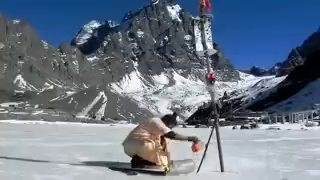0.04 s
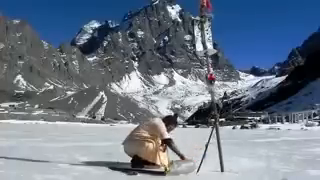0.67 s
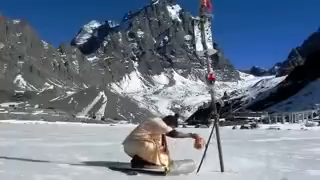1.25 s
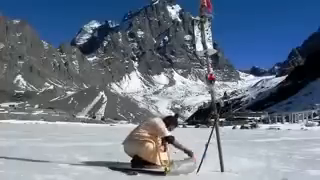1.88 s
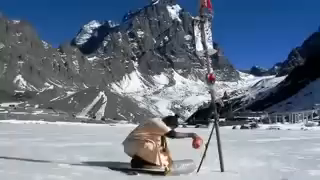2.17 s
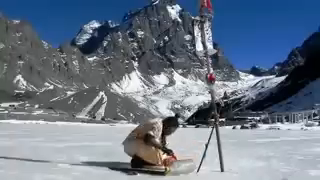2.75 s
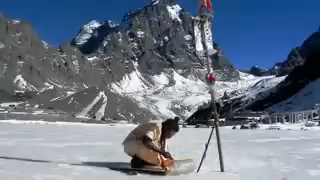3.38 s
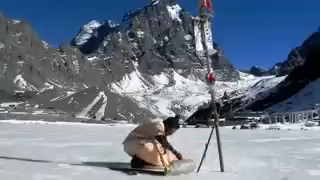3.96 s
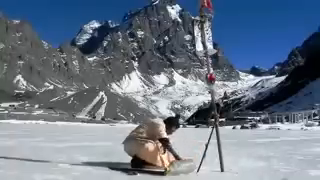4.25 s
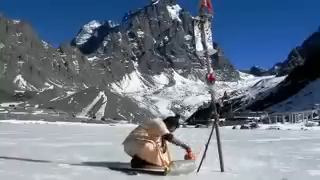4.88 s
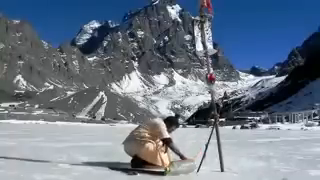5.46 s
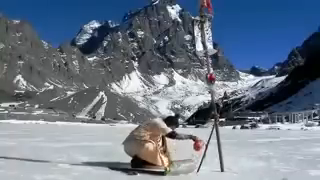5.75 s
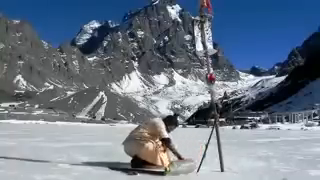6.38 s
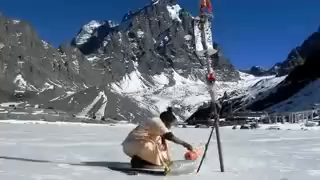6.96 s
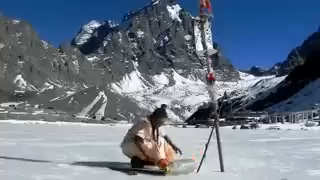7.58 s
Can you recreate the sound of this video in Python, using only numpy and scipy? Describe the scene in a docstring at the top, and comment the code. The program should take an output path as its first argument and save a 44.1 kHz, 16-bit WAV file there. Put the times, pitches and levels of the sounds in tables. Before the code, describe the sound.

A small pot dips into water in an ice hole right at the start, with a close slap, a hollow plop and a few drips. At about 0.5 seconds the water is flung out and spatters on the ice, fading into a trickle. Glugging dips follow around 1 and 2 seconds, each answered by a short splash, at 1.6 and 2.6 seconds. From 3 to about 4.2 seconds it is quieter, with small slaps and gentle swishes. The pot gulps again around 4.5 seconds and a throw lands at 5.1. Two more scoops come at 5.7 and 6.7 seconds, with splashes at about 6.1 and 7.2. Single fat drops tick on the ice, and drips plink back into the hole. Throughout, light wind buffets the microphone with a low rumble and soft, irregular thumps over a faint open-air hiss.

```python
"""A slap, a plop and a glug: someone crouching on a frozen lake dips a small pot into a hole in the ice,
then flings the water out, again and again. On each dip water slaps the pot and shuts in pockets of air
that ring as bubbles. Each throw spatters on the ice and ends in a trickle; the lifted pot drips dry.
Behind it, light wind buffets the microphone over a faint open-air hiss."""
import sys
import numpy as np
from scipy import signal
from scipy.io import wavfile
from scipy.ndimage import uniform_filter1d

SR = 44100
rng = np.random.default_rng(int(sys.argv[2]) if len(sys.argv) > 2 else 0)


def pcm_store(signal):
    """Save signal as 16-bit PCM."""
    levels = np.round(np.clip(np.atleast_2d(signal), -1, 1) * 32767)
    wavfile.write(sys.argv[1], SR, levels.astype(np.int16).T)


N = 336042

# The pot gulps: a slap, a plop as air is shut in, then a ringing bubble. Each row: start in seconds,
# relative slap level in dB, pitch of the struck hollow in Hz, plop level in dB, ring level in dB,
# ring pitch in Hz, ring decay in seconds.
GULPS = [(0.0781, -26, 2050, -19.5, -37, 308, 0.011), (0.9165, -31, 802, -21.5, -34, 354, 0.064),
         (1.1199, -27.5, 780, -20, -38, 383, 0.026), (1.9298, -28, 2500, -43, -16.5, 436, 0.0056),
         (2.0323, -28.5, 840, -16.5, -25, 397, 0.016), (2.0881, -23.5, 1950, -15.5, -23, 404, 0.0082),
         (2.129, -24, 2440, -38, -31, 608, 0.012), (3.051, -31.5, 710, -30, -28.5, 500, 0.0085),
         (3.7856, -33.5, 1980, -33, -38, 433, .005), (4.33, -27, 1560, -43, -29, 372, 0.017),
         (4.4428, -32, 1960, -30, -21, 470, 0.013), (4.6239, -28.5, 1720, -32, -32.5, 600, 0.043),
         (5.668, -30, 770, -34, -33, 628, .04), (5.6915, -24.5, 800, -26, -25.5, 677, 0.011),
         (5.714, -33, 900, -18.5, -29, 286, 0.0042), (5.727, -28, 1050, -15.5, -23, 392, 0.013),
         (6.609, -34, 1330, -23, -34, 437, 0.022), (6.7167, -36, 1810, -26.5, -34.5, 565, 0.039),
         (6.7628, -29.5, 2590, -22.5, -30.5, 654, 0.012), (6.781, -35, 2050, -25.5, -31, 373, 0.025),
         (6.8096, -26.5, 2770, -23, -34, 252, 0.0054)]
SLAP_TO_PLOP_S = 0.00398


def plops(half_width_cycles=0.25):
    """A closing air pocket gives one push of pressure between two dips; bigger pockets push slower."""
    out, t = np.zeros(N), np.arange(-300, 300) / SR
    for s, _, _, db, _, ring_hz, _ in GULPS:
        widths = t * ring_hz / half_width_cycles
        push = (1 - 1.2 * widths ** 2) * np.exp(-widths ** 2 / 2)
        add(out, s + SLAP_TO_PLOP_S + t[0], gain_of(db) * push)
    return out


# Bubbles glug up through the water, some just after a slap. Each row: start in seconds, level in dB,
# pitch in Hz, relative pitch rise per second, decay in seconds.
GLUGS = [(.06, -30.5, 569, 5, 0.12), (.812, -33, 388, 1.5, 0.022), (.921, -34.5, 778, 0.5, 0.031),
         (.97, -19, 365.6, 7.5, 0.03), (.999, -17.5, 382.4, 6.5, 0.021), (1.216, -38.5, 403, 4, 0.069),
         (1.786, -28.5, 419, 1, 0.0089), (1.973, -22, 398, 10.5, .01), (2.071, -24, 508, 7.5, 0.021),
         (4.29, -33, 405, -0.5, 0.015), (4.527, -19.5, 427, 8.5, 0.0068), (4.655, -31.5, 665, 4.5, 0.019),
         (5.348, -31, 382, 3, 0.02), (5.517, -31, 310, 18, 0.05), (5.539, -29.5, 455, 28, 0.012),
         (6.324, -31, 409, 11.5, 0.014), (6.658, -33, 432, 3, 0.0094), (6.829, -29.5, 687, 2, 0.0098)]
# Drips from the pot plink back into the hole. Each row: start in seconds, level in dB, pitch in Hz.
PLINKS = [(.152, -37.5, 1100), (.222, -43, 1300), (2.177, -41, 683), (2.256, -43.5, 886), (2.291, -45, 930),
          (2.442, -48, 1265), (4.804, -42, 647), (5.77, -32.5, 703), (5.802, -36.5, 650),
          (6.851, -42, 1064), (6.927, -42, 1070), (6.943, -37.5, 1030), (7.321, -32.5, 960)]


def glugs(gulp_rise=4.9, plink_rise=7, plink_decay_s=0.0074, wobble=0.34, slosh_db=-11, life_s=0.045):
    """Bubbles wobble as they ring, stir the water around them and die once they break the surface."""
    rings, stir = np.zeros(N), np.zeros(N)
    trapped = [(s + SLAP_TO_PLOP_S, db, hz, gulp_rise, decay) for s, _, _, _, db, hz, decay in GULPS]
    dripped = [(s, db, hz, plink_rise, plink_decay_s) for s, db, hz in PLINKS]
    for s, db, hz, rise, decay in trapped + GLUGS + dripped:
        ring = bubble(hz, rise, onset_s=0.00032, decay_s=decay)
        age = np.arange(len(ring)) / SR
        ring *= gain_of(db) / np.sqrt(1 + (age / life_s) ** 8)  # choked at the surface
        add(rings, s, ring)
        add(stir, s, abs(ring))
    slosh = droplets(per_s=2500, spread_db=1, cycles=2.4, low_hz=335, high_hz=660, count=12)
    slosh *= gain_of(slosh_db) * uniform_filter1d(stir, size=128)
    return rings * (1 + wobble * wander(per_s=160)) + slosh


# Further slaps of water, at the pot or on the ice, some followed by a glug.
# Each row: start in seconds, relative level in dB, pitch of the hollow in Hz.
SLAPS = [(.052, -28, 800), (0.1071, -23, 2500), (.618, -32.5, 1700), (0.754, -29.5, 1360),
         (1.1498, -24.5, 2060), (2.0697, -31.5, 1530), (2.8467, -33.5, 1500), (3.063, -30, 1770),
         (3.073, -33, 2560), (4.6102, -33, 1010), (4.781, -41.5, 2300), (5.28, -34.5, 1320),
         (5.32, -32.5, 1380), (5.345, -28.5, 1280), (5.3673, -31.5, 1460), (6.3168, -25, 1010)]
# The wet pot's dull resonances. Each row: frequency in Hz, gain in dB.
POT_EQ = [(110, -15.5), (190, -0.5), (650, 1), (1100, -9.5), (1700, -5), (2150, -9.5), (2650, -5),
          (3100, -9.5), (3700, -7.5), (5200, -21), (8800, -34)]


def slaps(level_db=-5, hollow_db=5, onset_s=0.0012, length_s=0.011, tail_db=-15, tail_s=0.018):
    """Water strikes a hollow: a tight, coloured burst of spray with a faint tail of falling drops."""
    spray = evened(coloured(impacts(per_s=9000, spread_db=3), POT_EQ))
    out, t = np.zeros(N), np.arange(SR // 8) / SR
    attack = 1 - np.exp(-t / onset_s)
    body = np.exp(-(t / length_s) ** 2)
    tail = gain_of(tail_db) * np.exp(-t / tail_s)
    for s, db, hz, *_ in GULPS + SLAPS:
        burst = spray[int(s * SR):][:len(t)] * attack * (body + tail)
        hollow = signal.lfilter(*signal.iirpeak(hz, Q=7, fs=SR), burst)
        burst += gain_of(hollow_db) * hollow
        peak_rms = np.sqrt(uniform_filter1d(burst ** 2, size=256).max())
        add(out, s, gain_of(db + level_db) * burst / peak_rms)
    return out


# A potful rains on the ice. Each row: first landing in seconds, swell time in seconds, end of the main
# sheet in seconds, level in dB, extra treble in dB.
THROWS = [(.525, .04, 0.76, -38, 0.5), (1.578, 0.047, 1.888, -39, 1), (2.604, 0.044, 2.873, -40, 1),
          (5.095, 0.17, 5.356, -38.5, -0.5), (6.144, .14, 6.457, -38.5, 1.5),
          (7.173, .045, 7.347, -38.5, 3.5)]
# The tone of water hitting ice. Each row: frequency in Hz, gain in dB.
SPATTER_EQ = [(150, -48.5), (250, -13.5), (415, 0), (535, -4.5), (787, -0.5), (861, -18), (942, -6.5),
              (1540, 0.5), (1730, -5), (1900, -1.5), (3190, -5.5), (4710, -9.5), (6060, -20.5), (7810, -22),
              (8800, -33), (11400, -64.5), (19400, -120)]


def throws(clump_db=2, surge_db=1.5, fine_spray_db=5, fine_spray_s=0.055):
    """Sheets of water break into clumps of ticks, fizz and bubble notes; the finest spray lands first."""
    ticks = evened(coloured(impacts(per_s=4000, spread_db=3.2), SPATTER_EQ))
    fizz = droplets(per_s=1400, spread_db=3, cycles=2.5, low_hz=950, high_hz=3700)
    notes = droplets(per_s=130, spread_db=3.1, cycles=5.5, low_hz=850, high_hz=2400, rise=0.035)
    clumps = gain_of(clump_db * wander(per_s=90))
    spatter = evened((ticks + gain_of(-4) * fizz + gain_of(-1.5) * notes) * clumps)
    treble = signal.sosfiltfilt(signal.butter(2, 3500, "high", fs=SR, output="sos"), spatter)
    out, t = np.zeros(N), np.arange(N) / SR
    for start, swell, end, db, treble_db in THROWS:
        fine_spray = np.exp(-np.maximum(t - start, 0) / fine_spray_s)
        brightness = gain_of(treble_db + fine_spray_db * fine_spray)
        sheet = gain_of(db) * envelope(start, swell, end, fall_db_per_s=114)
        out += sheet * (spatter + (brightness - 1) * treble)
    return out * gain_of(surge_db * wander(per_s=32))


# Single fat drops tick on the ice. Each row: start in seconds, level in dB, pitch in Hz.
FAT_DROPS = [(.2, -22, 1160), (.2455, -33, 1920), (.362, -36, 2020), (.4445, -31.5, 3580),
             (.6315, -19.5, 1970), (.732, -24, 2320), (.9545, -30.5, 3820), (2.7535, -27, 2000),
             (5.947, -32, 3730), (6.027, -36, 4760), (6.434, -19.5, 5500), (6.4662, -23, 2820)]


def fat_drops(decay_cycles=0.88):
    """A fat drop snaps and rings for a cycle or two."""
    out = np.zeros(N)
    for s, db, hz in FAT_DROPS:
        add(out, s, gain_of(db) * bubble(hz, rise=0, onset_s=0.5 / hz, decay_s=decay_cycles / hz))
    return out


# The pot comes up streaming and drips dry. Each row: start in seconds, relative level in dB.
LIFTS = [(.11, -47), (1.15, -50.5), (2.13, -51.5), (5.72, -47.5), (6.82, -50)]
# The pot swishes through the water. Each row: crest time in seconds, relative level in dB.
SWISHES = [(0.032, -39), (1.012, -44), (3.727, -47), (4.249, -48), (4.3, -48), (4.52, -49.5),
           (4.581, -47.5), (4.785, -45.5)]


def trickle(level_db=-2, runoff_db=-10.5, swish_in_s=0.031, swish_out_s=0.024):
    """Loose water patters, plinks and laps, riding up with each throw's run-off, each lift and swish."""
    t = np.arange(N) / SR
    runoff = [gain_of(db + runoff_db) * envelope(start, end - start, end, fall_db_per_s=29)
              for start, _, end, db, _ in THROWS]
    lifts = [gain_of(db) * envelope(s, swell=0.015, end=s, fall_db_per_s=28) for s, db in LIFTS]
    swishes = [gain_of(db) * np.exp(-np.maximum((s - t) / swish_in_s, (t - s) / swish_out_s))
               for s, db in SWISHES]
    flow = np.linalg.norm(runoff + lifts + swishes, axis=0)  # they add in power
    patter = evened(coloured(impacts(per_s=3000, spread_db=3.8), SPATTER_EQ))
    plinks = droplets(per_s=65, spread_db=2.5, cycles=4.5, low_hz=750, high_hz=2800, rise=0.03)
    drips = evened(patter + gain_of(-3.5) * plinks)
    laps = droplets(per_s=40, spread_db=4, cycles=4.5, low_hz=390, high_hz=1104, rise=0.055, count=12)
    return gain_of(level_db) * flow * (drips + gain_of(-10) * laps)


def early_echoes(x, level_db=-15, decay_s=0.025, per_s=2000, gap_s=0.003):
    """The rim of the hole and the crouching body throw back faint, early echoes."""
    t = np.arange(SR // 8) / SR
    taps = rng.standard_normal(len(t)) * (rng.random(len(t)) < per_s / SR)
    taps *= np.exp(-t / decay_s) * (t > gap_s)
    return gain_of(level_db) * signal.oaconvolve(x, taps / np.linalg.norm(taps))[:N]


# The slow rise and fall of the breeze. Each row: time in seconds, relative level in dB.
GUSTS = [(0.0, -46), (1.74, -51.5), (2.31, -44.5), (2.63, -54.5), (3.03, -52.5), (3.52, -62.5), (4.37, -51),
         (4.79, -50), (5.69, -57.5), (6.09, -45), (6.79, -55.5), (7.62, -44)]
# Strong eddies thump the microphone. Each row: crest time in seconds, level in dB.
THUMPS = [(.16, -34), (.46, -37.5), (1.13, -32.5), (1.22, -33.5), (1.89, -33), (2.23, -40), (2.46, -40.5),
          (3.06, -45), (3.849, -41), (4.3, -41), (4.65, -46), (4.79, -41.5), (4.87, -41), (5.34, -42),
          (5.9, -35), (6.01, -41.5), (6.191, -38), (6.43, -37.5), (7.23, -39)]
# The wind's low rumble. Each row: frequency in Hz, gain in dB.
WIND_EQ = [(8.8, -35.5), (15, -5.5), (38, 1.5), (60, 1.5), (114, -9), (161, -20.5), (225, -32),
           (248, -50.5), (260, -30.5), (340, -80), (570, -120)]


def wind(breeze_db=2, lump_db=3, thump_half_s=0.035):
    """Eddies buffet the microphone, their strength following the breeze; a few strong ones thump it."""
    t = np.arange(N) / SR
    eddies = evened(coloured(rng.standard_normal(N), WIND_EQ, size=32768))
    eddies /= np.sqrt(uniform_filter1d(eddies ** 2, size=3000) + 1e-6)  # iron out the noise's own swells
    lumps = evened(gain_of(lump_db * wander(per_s=16)))
    breeze = gain_of(np.interp(t, *np.transpose(GUSTS)) + breeze_db) * lumps
    thumps = sum(gain_of(db) * np.exp(-((t - s) / thump_half_s) ** 2) for s, db in THUMPS)
    return np.hypot(breeze, thumps) * evened(eddies)


# The tone of the open air. Each row: frequency in Hz, gain in dB.
AIR_EQ = [(59, -39.5), (100, -17), (140, -8.5), (166, -9.5), (270, -11), (314, -10), (351, -2.5),
          (651, -11.5), (1280, -16), (1400, -14), (1860, -16), (7860, -24), (8800, -31), (11400, -63),
          (19400, -120)]


def air(level_db=-60):
    """A steady bed of faint open-air hiss."""
    return gain_of(level_db) * evened(coloured(rng.standard_normal(N), AIR_EQ))


def bubble(hz, rise, onset_s, decay_s):
    """A bubble rings and climbs as it nears the surface; rise is the relative pitch change per second."""
    t = np.arange(int(6 * decay_s * SR) + 2) / SR
    shape = (1 - np.exp(-t / onset_s)) * np.exp(-t / decay_s)
    return shape / shape.max() * np.sin(2 * np.pi * hz * (t + rise * t * t / 2))


def impacts(per_s, spread_db):
    """Drops land at random: many small, a few large."""
    size = gain_of(spread_db * np.minimum(rng.exponential(1, N), 4))
    return size * rng.choice([-1, 1], N) * (rng.random(N) < per_s / SR)


def droplets(per_s, spread_db, cycles, low_hz, high_hz, rise=0.028, count=32):
    """Small bubbles of many sizes ring for a few cycles; rise is the relative climb per decay time."""
    out = np.zeros(N)
    for hz in np.geomspace(low_hz, high_hz, count):
        decay_s = cycles * (0.5 + rng.random()) / hz
        ring = bubble(hz, rise / decay_s, 0.5 / hz, decay_s)
        out += np.sqrt(hz) * signal.oaconvolve(impacts(per_s / count, spread_db), ring)[:N]
    return evened(out)


def envelope(start, swell, end, fall_db_per_s):
    """Starts abruptly and swells, then dies away from the end time on."""
    t = np.arange(N) / SR
    attack = np.clip((t - start) / swell, 0, 1) ** 0.41
    return attack * gain_of(-fall_db_per_s * np.maximum(t - end, 0))


def coloured(x, eq, size=4096):
    """Minimum-phase EQ, so that clicks keep their sharp front."""
    eq_hz, eq_db = np.transpose(eq)
    hz = abs(np.fft.fftfreq(size, 1 / SR))
    log_gain = np.log(gain_of(np.interp(np.log(hz + 1), np.log(eq_hz + 1), eq_db)))
    taps = np.fft.ifft(np.exp(signal.hilbert(log_gain).conj())).real
    return signal.oaconvolve(x, taps[:size // 2])[:len(x)]


def wander(per_s):
    """Smooth random drift of rms 1."""
    width = int(SR / per_s)
    return evened(uniform_filter1d(uniform_filter1d(rng.standard_normal(N), width), width))


def gain_of(db):
    """Decibels to amplitude."""
    return 10 ** (np.asarray(db) / 20)


def evened(x):
    """Scales to rms 1."""
    return x / np.sqrt(np.mean(x ** 2) + 1e-20)


def add(mix, s, sound):
    """Mixes a sound in at s seconds."""
    part = mix[max(round(s * SR), 0):][:len(sound)]
    part += sound[:len(part)]


def scene():
    """The mono mix: water in the hole and on the ice up front, weather behind."""
    close_water = glugs() + plops() + slaps() + fat_drops()
    return (close_water + early_echoes(close_water) + throws() + trickle() + wind() + air())[None]


def record(dry, cutoff_hz=8900):
    """A steep low-pass takes off the top end."""
    lowpass = signal.firwin(401, cutoff_hz, window=("kaiser", 8), fs=SR)
    return signal.oaconvolve(dry, lowpass[None], "same")


dry = scene()
out = record(dry)
pcm_store(out)
```